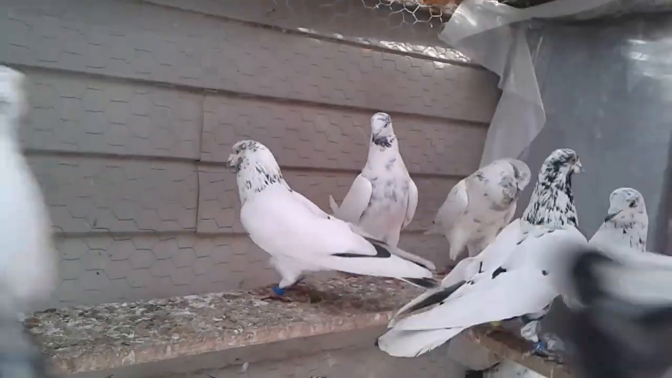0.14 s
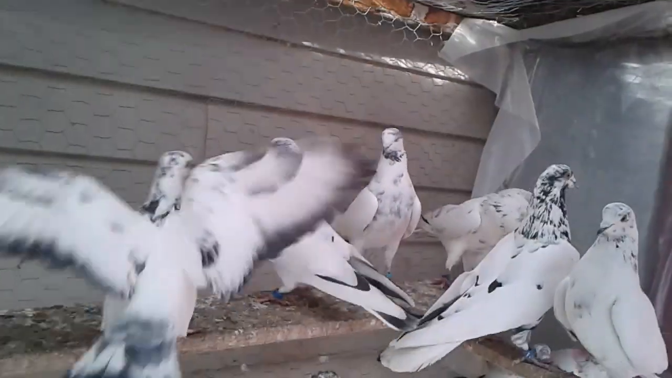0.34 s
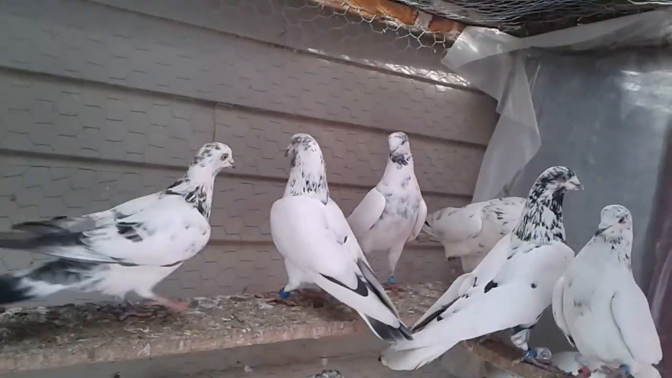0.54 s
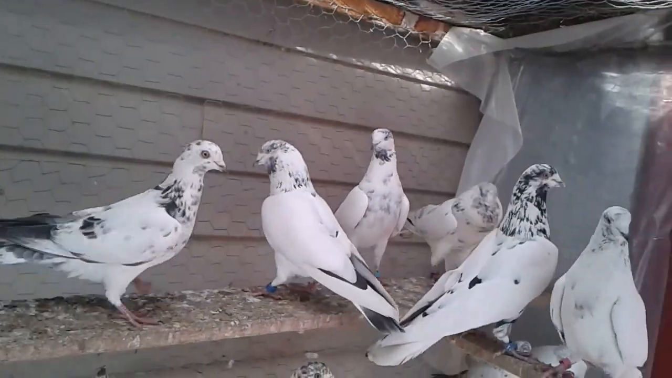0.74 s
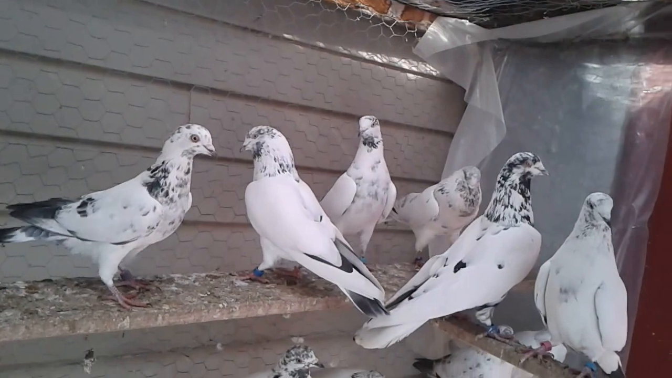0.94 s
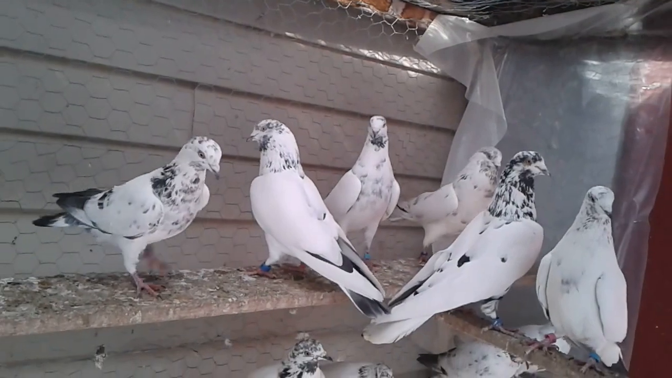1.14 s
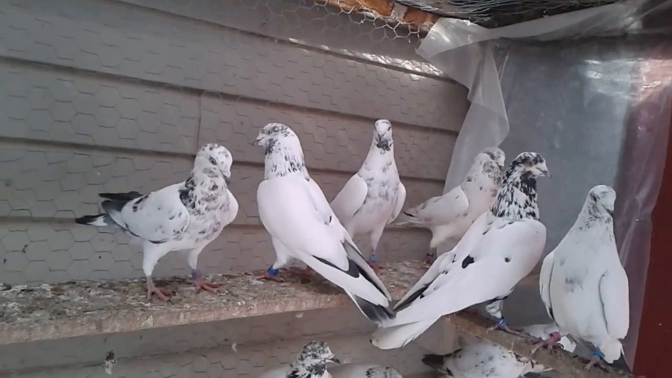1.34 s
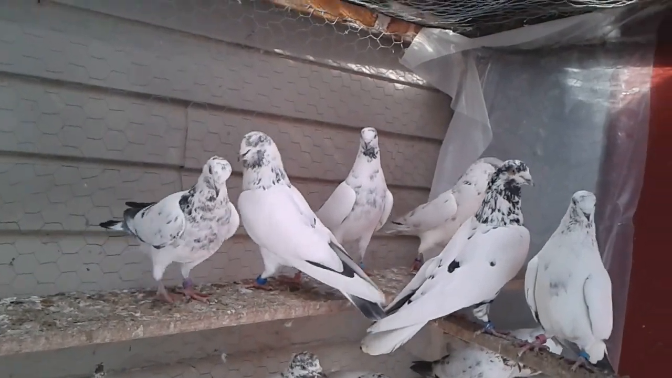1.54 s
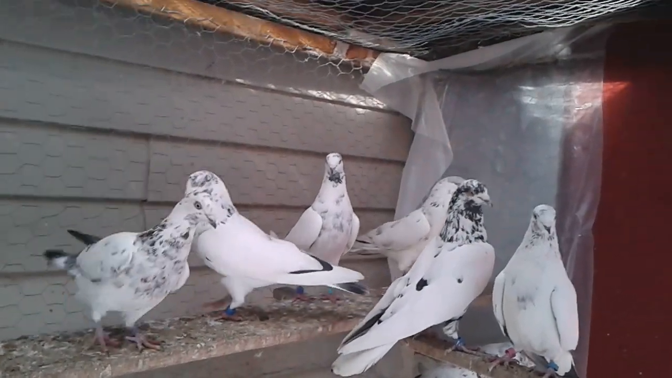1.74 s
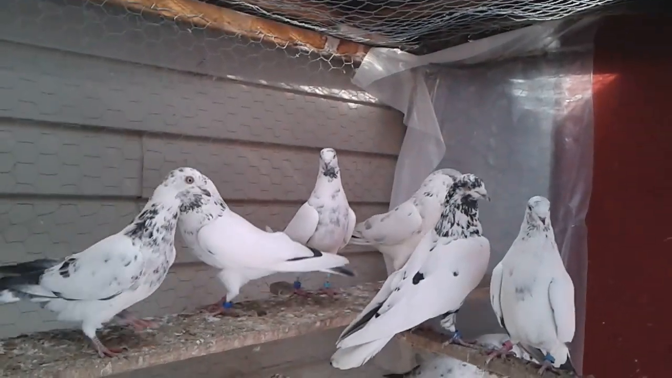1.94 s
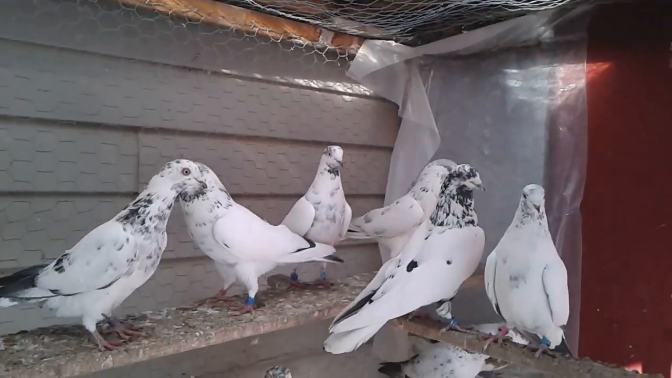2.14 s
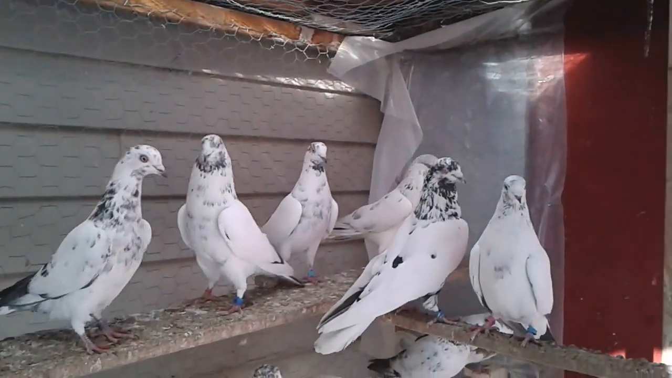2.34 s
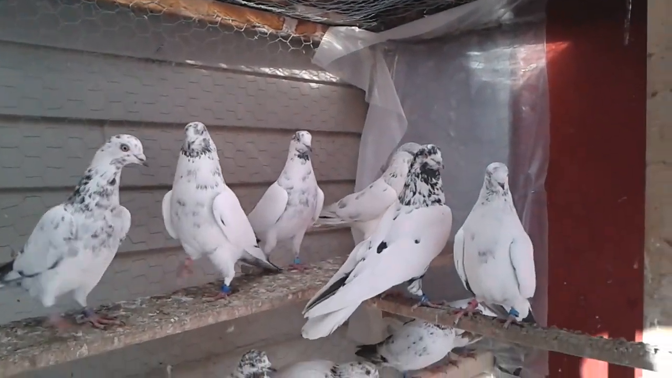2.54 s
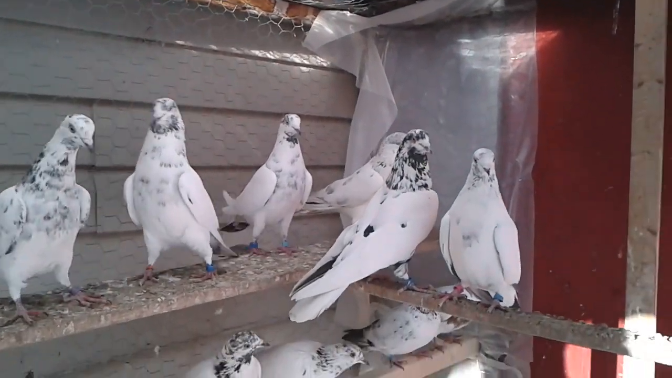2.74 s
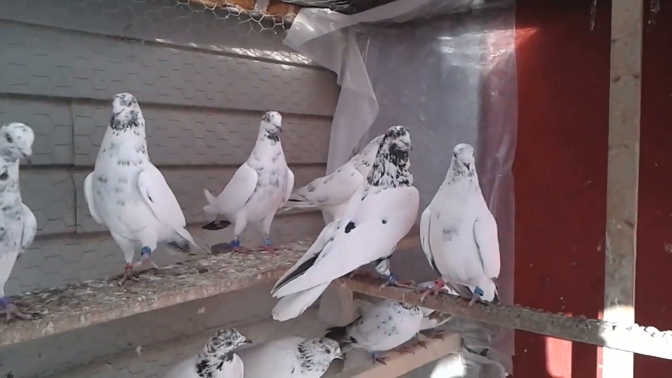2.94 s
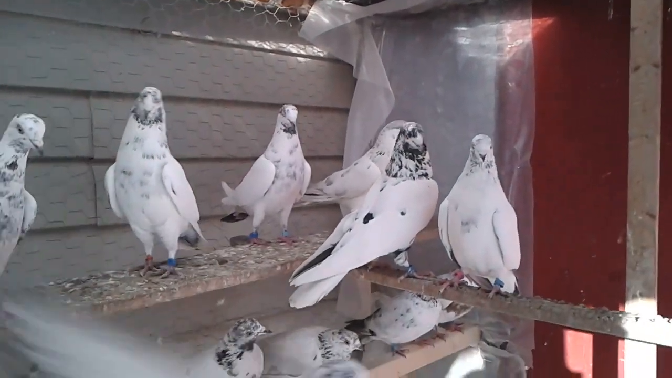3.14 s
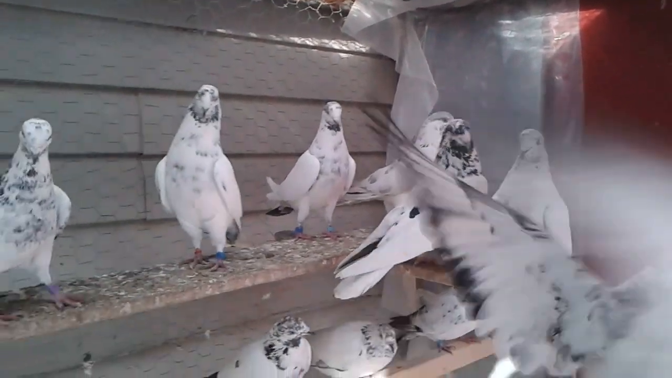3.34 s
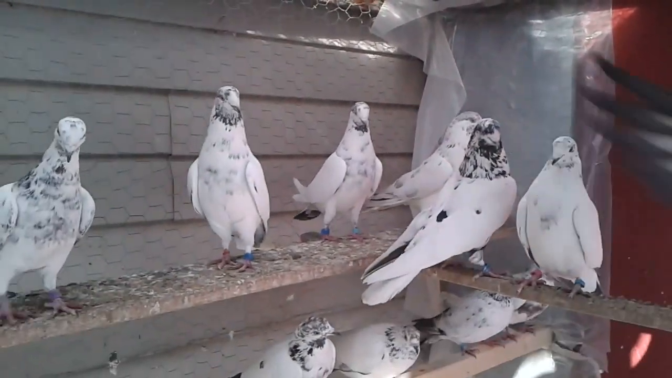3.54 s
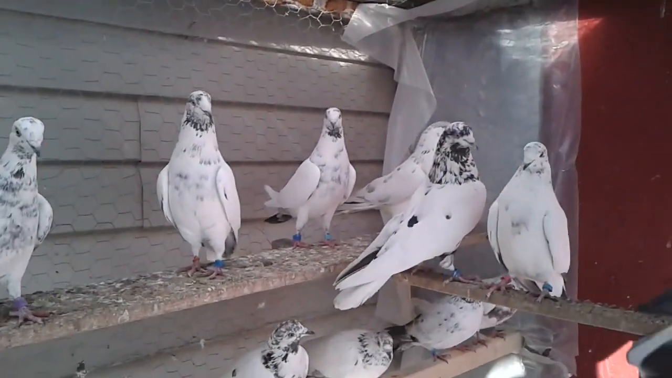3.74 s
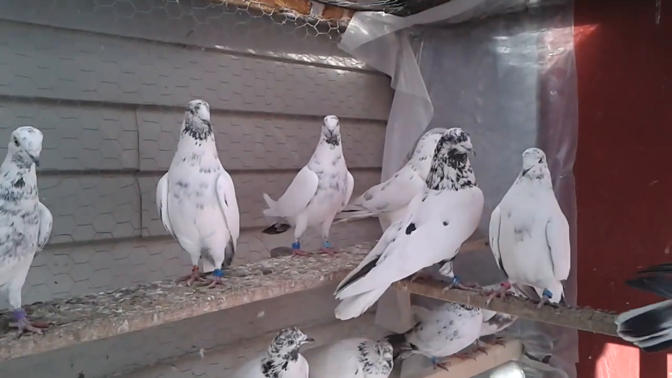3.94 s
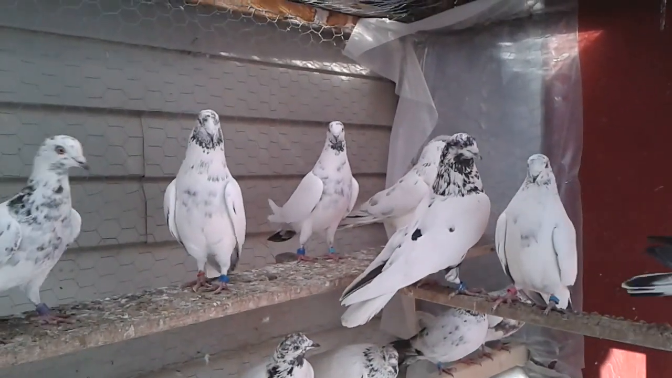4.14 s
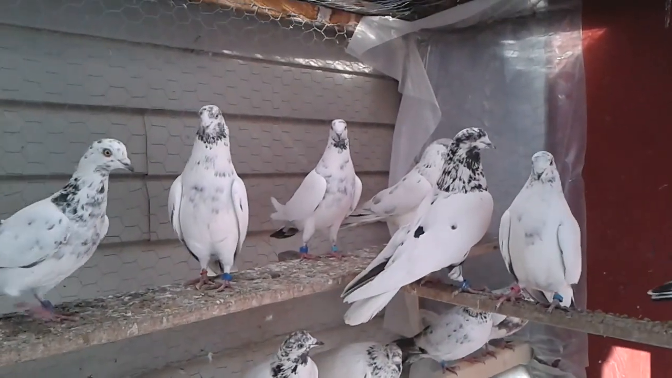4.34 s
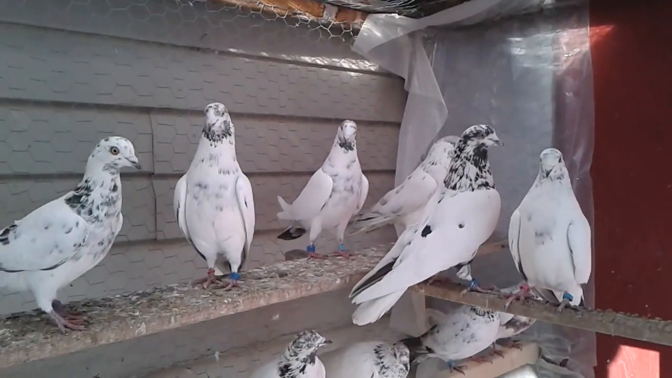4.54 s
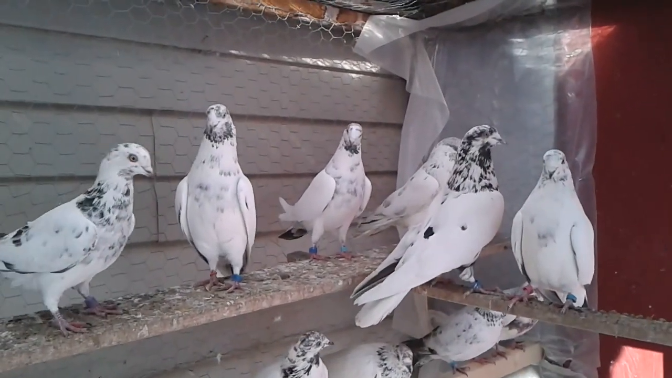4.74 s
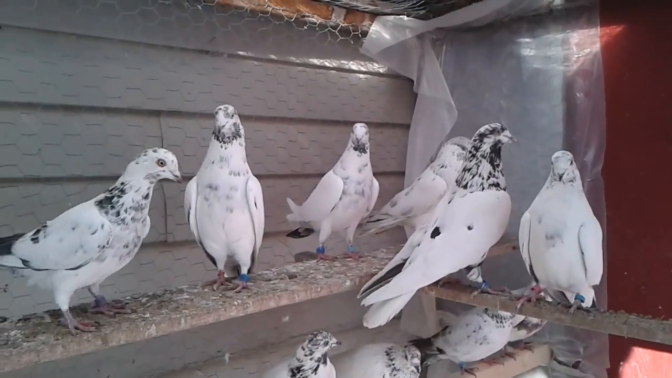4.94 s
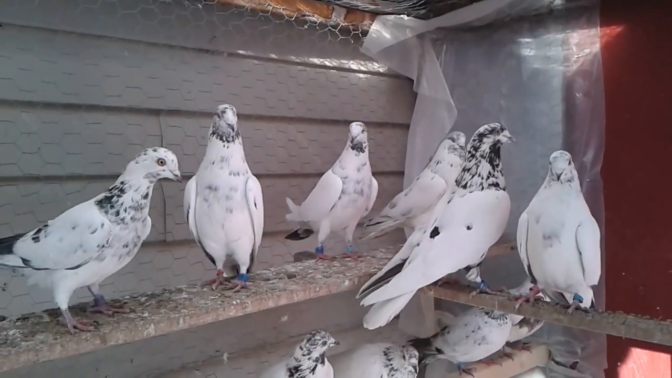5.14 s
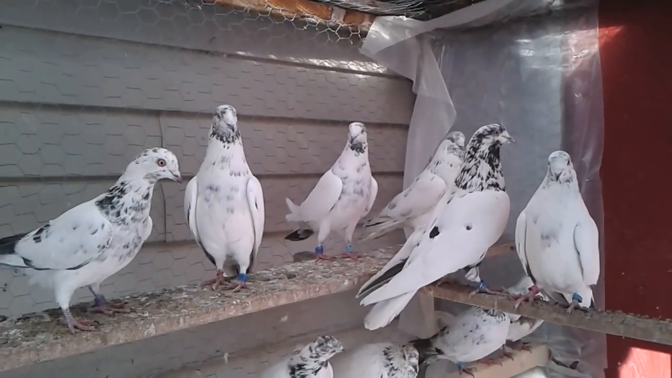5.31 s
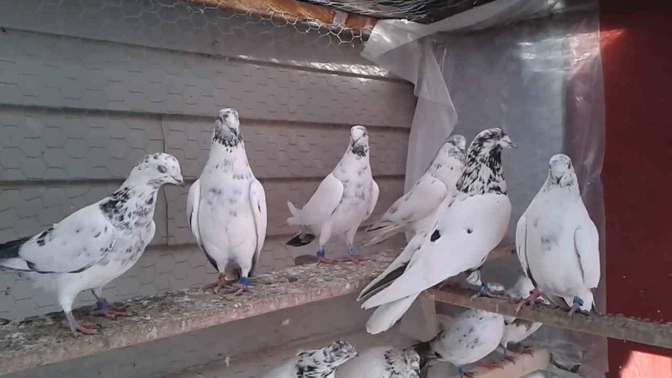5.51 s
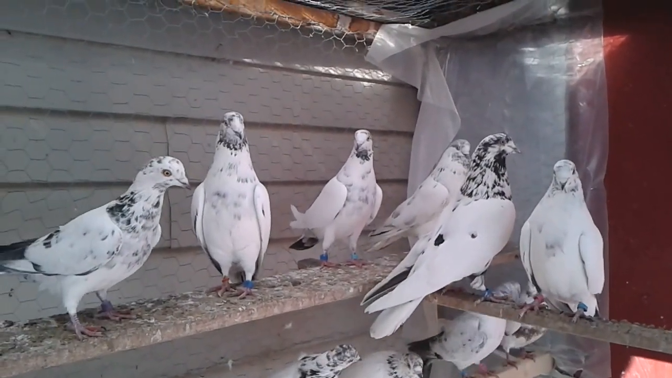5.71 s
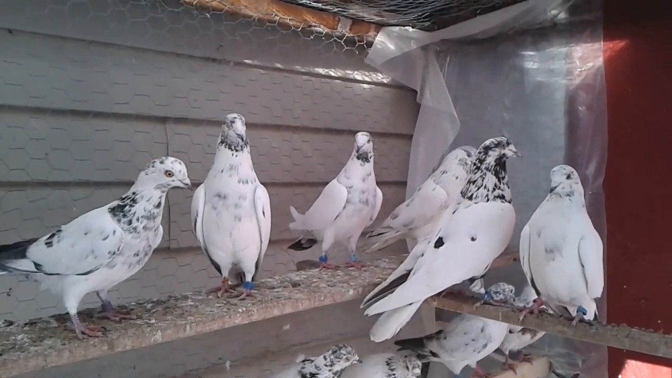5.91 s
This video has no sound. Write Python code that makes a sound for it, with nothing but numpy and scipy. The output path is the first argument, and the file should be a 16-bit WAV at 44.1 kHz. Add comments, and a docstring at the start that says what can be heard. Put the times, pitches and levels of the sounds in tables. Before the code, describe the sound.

A close single microphone, the same in both channels, in a small wooden pigeon loft with short reflections and a faint dull outdoor wash. From 0 to 0.45 s a bird lands: hard, bright wing claps, the loudest near 0.24 s slightly overloaded, with airy swishes, low gusts and brief feather buzzes. A dull board thump follows at 0.48 s. A cock coos three phrases, high arching notes falling into low moans with throaty rolling pulses, about 0.4-0.85, 0.93-1.45 and 1.85-2.55 s, the last strongest. Feathers shuffle between; a dull knock comes at 1.6 s alongside a faint distant coo. At 3.1-3.45 s another bird flaps past, softer and more muffled. Scratchy claw ticks stand out at 3.5-3.7 s, then sparse light steps until about 5.2 s, with a soft thud at 4.6 s. Rustling fades almost away, a gentle feather brush comes near 5.6 s, and a tiny bright ping sounds at 5.95 s.

```python
"""Pigeons in a wooden loft

One bird lands with loud wing claps, a cock coos three rolling phrases, and a second bird flies past.
Between the flights feathers rustle, claws tick on the perches, and a dull knock and a faint distant
coo are heard over an outdoor wash. Wings, feet and air are noise shaped by envelopes and spectra;
coos are gliding partials and ringing throat pulses; feather flutter is a wavering tone.
Wooden walls add a short reverberation."""
import sys
import numpy as np
from scipy import signal
from scipy.fft import rfft, irfft
from scipy.io import wavfile
from scipy.ndimage import uniform_filter1d

SR = 44100
rng = np.random.default_rng(int(sys.argv[2]) if len(sys.argv) > 2 else 0)


def to_wav(sig):
    """Store sig (one row per channel, or 1-D mono) as 16-bit WAV at the path in sys.argv[1].

    Samples outside -1..1 are clipped; the rate is SR.
    """
    pcm = np.clip(np.atleast_2d(sig), -1, 1) * 32767
    pcm = np.round(pcm).astype(np.int16)
    wavfile.write(sys.argv[1], SR, pcm.T)  # frames by channels


N = 263277
TIME = np.arange(N) / SR  # s

# Stirring of the perched flock, as a curve: time_s, rustle_db (before the offset of each sound)
STIR = [(.75, -51.5), (1.06, -46.5), (1.25, -55), (1.55, -59.5), (1.73, -50), (1.92, -53), (2.15, -51.5),
        (2.42, -53.5), (2.9, -53.5), (3.73, -49.5), (3.82, -62.5), (4.7, -64), (5.1, -70.5), (5.55, -73),
        (5.8, -65)]
# Bright noise spectrum of sliding feathers and of the small tick: frequency_hz, relative_density_db
HISS = [(1500, -22), (3000, -6.5), (4300, -5), (5600, -6), (6800, -3), (8200, -1.5), (10000, -2),
        (12500, -2), (15000, -9.5)]
# The landing and the fly-past: full_effort_from_s, until_s, feather_hiss_db, air_swish_db, draught_db
FLIGHTS = [(0.025, 0.439, -29, -28, -40.5), (3.13, 3.415, -34, -30, -37.5)]
# Wingbeats in flight: start_s, clap_db, rise_s, decay_s, body_db (against the clap), following_sweep_db
WINGBEATS = [(0.0916, -7, 0.00054, 0.0057, -4.5, -21.5), (.118, -6.5, 0.00092, 0.0096, -9.5, -19.5),
             (0.2394, 0, 0.00094, 0.0039, -9.5, -14.5), (0.343, -4, 0.017, 0.0085, -8, -18),
             (3.124, -26, 0.0035, 0.012, -2, -39), (3.187, -14.5, 0.0055, 0.0095, -10.5, -42),
             (3.215, -23, 0.00075, 0.0065, 2, -31), (3.328, -12.5, 0.0019, 0.01, -3.5, -34),
             (3.426, -20, 0.0039, 0.0062, 1, -49)]
# Flicks and shuffles of perched birds, and one dull knock at 1.603 s:
# start_s, treble_db, rise_s, decay_s, body_db (against the treble)
SHUFFLES_AND_KNOCK = [(.612, -35.5, .022, 0.058, -8), (0.676, -30.5, .003, 0.0087, -7.5),
                      (0.772, -23, 0.025, 0.02, -11.5), (0.988, -27.5, .0029, 0.018, -5),
                      (1.603, -61, 0.0017, 0.014, 11.5), (1.791, -33.5, 0.003, 0.013, -0.5),
                      (1.85, -47, 0.018, 0.011, 4.5), (2.008, -37, 0.023, 0.1, -9),
                      (2.185, -41.5, 0.0087, 0.01, -29), (2.275, -40.5, 0.022, 0.02, -5),
                      (2.917, -41, 0.0049, 0.025, -1.5), (3.009, -39, .024, 0.02, 3.5),
                      (3.478, -32.5, 0.023, .013, -0.5), (3.614, -38.5, 0.0033, 0.016, -5),
                      (3.695, -39.5, 0.0078, 0.041, -5.5), (4.36, -54, 0.017, 0.014, -7),
                      (4.875, -57.5, 0.013, 0.023, -3), (5.58, -45.5, 0.065, 0.04, -9.5),
                      (5.725, -52.5, 0.012, 0.014, -4.5)]


def amp(db):
    """Logarithmic level: decibels become an amplitude ratio."""
    return 10 ** (np.asarray(db) / 20)


def unit(x):
    """Power normalisation: scales a signal to rms 1."""
    return x / np.sqrt(np.mean(x ** 2) + 1e-20)


def read(points, hz):
    """Interpolation of a spectrum along a logarithmic frequency axis."""
    point_hz, value = np.transpose(points)
    return np.interp(np.log(hz + 1), np.log(point_hz + 1), value)


def add(mix, s, sound):
    """Superposition: adds a sound to the mix in place, from time s."""
    part = mix[max(round(s * SR), 0):][:len(sound)]
    part += sound[:len(part)]


def colour(x, spectrum, size=4096):
    """Minimum-phase filtering: the log gain fixes the phase of a causal filter of unit energy."""
    hz = abs(np.fft.fftfreq(size, 1 / SR))
    log_gain = np.log(amp(read(spectrum, hz)))
    response = np.exp(np.conj(signal.hilbert(log_gain)))
    taps_in_time = np.fft.ifft(response).real[:size // 2]
    return signal.oaconvolve(x, taps_in_time / np.linalg.norm(taps_in_time))[:len(x)]


def wander(rate_hz):
    """Low-pass random process of rms 1: a Gaussian roll-off leaves little motion above the rate."""
    hz = np.fft.rfftfreq(N, 1 / SR)
    spectrum = rfft(rng.standard_normal(N)) * np.exp(-(hz / rate_hz) ** 2)
    return unit(irfft(spectrum, N))


def grainy(clump_db, clump_hz):
    """Random amplitude modulation: noise comes in clumps, as barbs slip over each other."""
    clumps = amp(clump_db * np.tanh(wander(clump_hz) / 2) * 2)
    return unit(rng.standard_normal(N) * clumps)


def shifting(x, depth_db, size=512):
    """Time-varying resonance: bands come and go as the gaps between feathers open and close."""
    z = signal.stft(x, SR, nperseg=size, noverlap=size - size // 4)[2]
    patches = rng.standard_normal(z.shape)
    for _ in range(2):  # smooth over frequency, then over time
        patches = uniform_filter1d(patches, size=3, axis=0)
        patches = uniform_filter1d(patches, size=7, axis=1)
    gain = unit(amp(depth_db * 2 * np.tanh(unit(patches) / 2)))
    return signal.istft(z * gain, SR, nperseg=size, noverlap=size - size // 4)[1][:N]


def burst(rise, decay):
    """Transient envelope: a quadratic swell to 1, then exponential decay (times in s)."""
    t = np.arange(SR // 4) / SR
    swell = np.minimum(t / max(rise, 1e-4), 1) ** 2
    return swell * np.exp(-np.maximum(t - rise, 0) / max(decay, 1e-4))


def ambient(level_db=-54):
    """Stationary coloured noise: a steady dull wash from outside."""
    # Outdoor wash: frequency_hz, relative_density_db
    wash_spectrum = [(12, -35.5), (20, -5), (43, -13.5), (172, 0.5), (246, -3), (315, 1.5), (426, -7),
                     (781, -7), (1470, -21), (2290, -22.5), (5840, -32.5), (7910, -31), (13300, -31.5),
                     (14500, -21)]
    return amp(level_db) * colour(rng.standard_normal(N), wash_spectrum)


def flight(start, end, approach_db_per_s=122.5, settle_db_per_s=84):
    """Exponential growth and decay: the effort of a flight swells, holds and settles."""
    before_s, after_s = np.maximum(start - TIME, 0), np.maximum(TIME - end, 0)
    return amp(-approach_db_per_s * before_s - settle_db_per_s * after_s)


def airflow(start, end, surge_db=4.0, lag_s=0.022, width_s=0.035):
    """Power law of moving air: it grows faster with effort than feather hiss and surges after each beat."""
    power = 1.15
    surge = np.max([np.exp(-((TIME - s - lag_s) / width_s) ** 2) for s, *_ in WINGBEATS], axis=0)
    return flight(start, end) ** power * amp(surge_db * (surge - 1))


def rustle(stir_hiss_db=0.5, stir_swish_db=0.0):
    """Friction and flow noise: feathers slide and comb the air, softly perched and loudly in flight."""
    # Air combed by feathers: frequency_hz, relative_density_db
    swish_spectrum = [(150, -16), (350, 3), (800, 2), (1300, -3.5), (2200, -4.5), (3300, -13),
                      (6000, -24.5)]
    stir_db = np.interp(TIME, *np.transpose(STIR))
    hiss, swish = amp(stir_db + stir_hiss_db), amp(stir_db + stir_swish_db)
    for start, end, hiss_db, swish_db, _ in FLIGHTS:  # levels add in power
        hiss = np.hypot(hiss, amp(hiss_db) * flight(start, end))
        swish = np.hypot(swish, amp(swish_db) * airflow(start, end))
    fidget = amp(1.7 * wander(45))
    barbs = colour(grainy(clump_db=1.5, clump_hz=400) * fidget * hiss, HISS)
    air = shifting(grainy(clump_db=2, clump_hz=120), depth_db=4.5)
    return barbs + colour(air * swish, swish_spectrum)


def draught(lumpy_db=6.0):
    """Low-frequency turbulence: lumpy air under a flying bird; claps, shuffles and the knock add gusts."""
    # Pushed air: frequency_hz, relative_density_db
    push_spectrum = [(15, -4.5), (30, -14.5), (70, -2), (130, -2), (260, 3.5), (450, -5.5), (900, -27),
                     (2000, -45)]
    gust_db = -28  # against the treble of its event
    gust_rise_s, gust_decay_s = 0.02, 0.026
    level = sum(amp(db) * airflow(start, end) for start, end, _, _, db in FLIGHTS)
    for s, db, rise, *_ in WINGBEATS + SHUFFLES_AND_KNOCK:
        add(level, s + rise, amp(db + gust_db) * burst(gust_rise_s, gust_decay_s))
    return colour(level * grainy(lumpy_db, clump_hz=25), push_spectrum)


def flutters(jitter=0.04):
    """Aeroelastic flutter: a feather vane buzzes at an unsteady pitch at the fastest part of a stroke."""
    # Buzzes: start_s, length_s, start_pitch_hz, end_pitch_hz, level_db, octave_db (against the level)
    buzzes = [(0.028, 0.043, 807, 740, -25, 4), (.045, 0.044, 805, 724, -20.5, -18),
              (0.165, 0.03, 787, 657, -24, -5.5), (0.357, .02, 1273, 1310, -18, -27),
              (3.131, 0.028, 890, 754, -29, -7.5), (3.208, 0.0336, 820, 947, -24, 2.5),
              (3.31, 0.028, 783, 855, -26.5, -5), (3.424, 0.01, 1070, 1010, -20, -13)]
    out, waver = np.zeros(N), 1 + jitter * wander(330)
    for s, length, start_hz, end_hz, db, octave_db in buzzes:
        n = round(length * SR)
        hz = np.linspace(start_hz, end_hz, n) * waver[round(s * SR):][:n]
        phase = 2 * np.pi * np.cumsum(hz) / SR
        tone = np.sin(phase) + amp(octave_db) * np.sin(2 * phase)
        add(out, s, np.sqrt(2) * amp(db) * np.hanning(n) * tone)
    return out


def strokes_and_knock():
    """Impulsive radiation: wings clap or brush, a bright crack on a body of air; one knock is mostly body."""
    # Crack of feathers: frequency_hz, relative_density_db
    crack_spectrum = [(1500, -20.5), (3000, -8.5), (4200, -7), (5600, -7.5), (7500, -3), (10500, -2),
                      (13000, -3.5), (15000, -14)]
    # Displaced air: frequency_hz, relative_density_db
    body_spectrum = [(60, -8.5), (200, -6), (550, -2), (1000, -3), (1600, -0.5), (2400, -2.5), (4000, -21),
                     (8000, -45)]
    sweep_rise_s, sweep_decay_s = 0.026, 0.018
    sweep_body_db = 1.5  # a sweep has this much more body than its clap
    claps = [beat[:-1] for beat in WINGBEATS]
    # after the clap the wings peel apart
    sweeps = [(s + rise, sweep_db, sweep_rise_s, sweep_decay_s, body_db + sweep_body_db)
              for s, _, rise, _, body_db, sweep_db in WINGBEATS]
    crack, body = np.zeros(N), np.zeros(N)
    for s, db, rise, decay, body_db in claps + sweeps + SHUFFLES_AND_KNOCK:
        add(crack, s, amp(db) * burst(rise, decay))
        add(body, s, amp(db + body_db) * burst(rise, decay))
    air = shifting(grainy(clump_db=2, clump_hz=500), depth_db=4)
    feathers = colour(crack * grainy(clump_db=2.0, clump_hz=918), crack_spectrum)
    return feathers + colour(body * air, body_spectrum)


def arch(start, length, turn, start_hz, turn_hz, end_hz, bend):
    """Power-law glide: sample numbers and pitch of a note that reaches a turning point and leaves it."""
    at = np.arange(round(start * SR), round((start + length) * SR))
    progress = np.linspace(0, 1, len(at))
    away = np.interp(progress, [0, np.clip(turn, .05, .95), 1], [-1, 0, 1])  # 0 at the turn
    outer_hz = np.where(away < 0, start_hz, end_hz)
    return at, turn_hz + (outer_hz - turn_hz) * abs(away) ** bend


def coos(third_db=-27, husk_db=-16, fade=0.16):
    """Resonant filtering of song: near-pure closed-beak notes; the crop favours the octave of low ones."""
    # High notes that open a phrase and arch:
    # start_s, length_s, turn_share_of_length, start_pitch_hz, turn_pitch_hz, end_pitch_hz, start_level_db
    hoots = [(.39, 0.2, 0.44, 419.8, 537, 428, -27), (0.953, .208, 0.437, 574, 622.6, 553, -45),
             (1.959, .265, .5, 489, 739, 546, -42)]
    # Low moans that sag: three close a phrase, the faint one at 1.498 s is a distant coo:
    # start_s, length_s, turn_share_of_length, start_pitch_hz, turn_pitch_hz, end_pitch_hz,
    # level_db (before the crop), octave_db (against the level)
    moans = [(0.654, 0.18, 0.38, 321.5, 302.2, 282, -37, -14),
             (1.157, 0.25, 0.33, 443, 273.7, 322.6, -37.5, 1),
             (1.498, 0.31, 0.59, 304.4, 284.6, 298, -53, -10.5), (2.237, .242, .56, 469, 281, 338, -32, -4)]
    # Swollen crop that shapes a moan: frequency_hz, gain_db
    crop = [(255, -28), (282, -4.5), (303, -2), (350, -0.5), (460, -6.5), (535, -13.5), (575, 4.5),
            (615, -4), (680, -19), (900, -27)]
    # Turbulence in the throat: frequency_hz, relative_density_db
    husk_spectrum = [(100, -25), (230, 5.5), (450, -4), (750, -9), (1100, -11.5), (2500, -47)]
    hoot_octave_db = -22  # against the fundamental
    hoot_db_per_octave = -9.5  # the note thins as it climbs
    moan_swell_db = 1.5  # growth from start to end
    bend = 1.9  # power of the arch and of the sag
    out = np.zeros(N)
    waver, tremble = 1 + 0.008 * wander(60), amp(1.1 * wander(70))  # of pitch, of level
    husk = amp(husk_db) * colour(rng.standard_normal(N), husk_spectrum)

    def sing(at, hz, first_db, octave_db):
        """Harmonic synthesis: three partials and a little husk, faded in and out."""
        phase = 2 * np.pi * np.cumsum(hz * waver[at]) / SR
        partials = enumerate([first_db, octave_db, octave_db + third_db], 1)
        tone = np.sqrt(2) * sum(amp(db) * np.sin(k * phase) for k, db in partials)
        effort = np.hypot(amp(first_db), amp(octave_db))
        return (tone * tremble[at] + effort * husk[at]) * signal.windows.tukey(len(at), fade)

    for *glide, db in hoots:
        at, hz = arch(*glide, bend)
        level = db + hoot_db_per_octave * np.log2(hz / hz[0])
        out[at] += sing(at, hz, level, level + hoot_octave_db)
    for *glide, db, octave_db in moans:
        at, hz = arch(*glide, bend)
        level = db + moan_swell_db * np.linspace(-.5, .5, len(at))
        out[at] += sing(at, hz, level + read(crop, hz), level + octave_db + read(crop, 2 * hz))
    return out


def thumps():
    """Impact excitation: the board under a landing bird gives a dull, low knock."""
    # Feet coming down: start_s, level_db, decay_s
    landings = [(.48, -27, 0.055), (0.675, -38, 0.031), (4.598, -46, 0.018)]
    # Struck board: frequency_hz, relative_density_db
    board_spectrum = [(30, -5), (70, -3.5), (105, 4), (140, -6.5), (200, 0), (300, -5), (450, -4),
                      (900, -14), (2000, -30), (5000, -76)]
    push = np.zeros(N)
    for s, db, decay in landings:
        add(push, s, amp(db) * burst(0.0068, decay))
    return colour(push * rng.standard_normal(N), board_spectrum)


def rolls():
    """Pulse excitation: slow pulses of the syrinx, each weaker, ring the two resonances of the crop."""
    # Short rolls that break into the coo and close it: start_s, peak_db (lower resonance, first pulse),
    # pulse_count, lower_resonance_hz, upper_resonance_hz, upper_db (against the lower)
    throat_rolls = [(0.606, -29, 1, 332, 430, -18), (.826, -41, 1, 288, 461, 6),
                    (.934, -31.5, 1, 292, 564, -0.5), (1.027, -31.5, 2, 331, 600, 1),
                    (1.392, -36, 1, 260, 500, -1), (1.858, -38.5, 1, 211, 573, -2),
                    (1.938, -38.5, 1, 298, 615, -8), (2.004, -28, 3, 335, 570, -6.5),
                    (2.111, -27, 3, 362, 530, -3), (2.216, -26.5, 2, 316, 572, -2),
                    (2.491, -32, 3, 278, 514, 6)]
    pulse_s, gap_s = 0.0056, 0.016  # swelling time, spacing of pulses
    fade_db = -4.5  # each pulse against the one before
    out, t = np.zeros(N), np.arange(SR // 12) / SR
    swell = (t / pulse_s * np.exp(1 - t / pulse_s)) ** 1.6
    for s, db, pulses, low_hz, high_hz, upper_db in throat_rolls:
        lower = np.sin(2 * np.pi * low_hz * t)
        upper = amp(upper_db) * np.sin(2 * np.pi * high_hz * t)
        for k in range(round(pulses)):
            add(out, s + k * gap_s, amp(db + k * fade_db) * swell * (lower + upper))
    return out


def taps(tick_db=-3, knock_db=-4, tick_decay=0.0069, knock_decay=0.014):
    """Friction and impact: a claw scratches a short tick out of the perch, and the wood answers dully."""
    # Clearest claw steps: start_s, level_db (before tick_db or knock_db), wood_db (against the level)
    steps = [(0.9032, -34.5, -24), (1.1463, -39.5, 0), (1.457, -50, 2), (2.0785, -34, -12),
             (2.6813, -36, -12), (2.805, -51.5, 6), (3.5309, -25, -16), (3.5653, -33.5, -19),
             (3.6652, -25.5, -21), (3.9666, -37.5, -9.5), (4.0964, -41, -7.5), (4.144, -37.5, -8),
             (4.1644, -42, -19), (4.446, -37.5, -8), (4.5988, -38, -8.5), (4.6864, -37.5, -8),
             (4.716, -40.5, -19), (4.7658, -37.5, -12), (4.9494, -47.5, -4), (5.1778, -50, -15.5)]
    # Scratching claw: frequency_hz, relative_density_db
    claw_spectrum = [(1500, -24), (4000, -13), (5700, -14), (7200, -1), (8300, 3), (10000, -5.5),
                     (14000, -13.5)]
    # Answering wood: frequency_hz, relative_density_db
    wood_spectrum = [(150, 1.5), (400, -3.5), (1200, -2.5), (2000, 4.5), (2900, 3.5), (4000, -3.5),
                     (6000, -42.5)]
    # further steps at random moments, their level set against the stirring of the flock
    faint_steps, faint_db, faint_spread_db, faint_wood_db = 22, 4, 3.5, -7
    chance = rng.uniform([0, -1], [N / SR, 1], (faint_steps, 2))
    faint = [(s, np.interp(s, *np.transpose(STIR)) + faint_db + faint_spread_db * size, faint_wood_db)
             for s, size in chance]
    tick, knock = np.zeros(N), np.zeros(N)
    for s, db, wood_db in steps + faint:
        add(tick, s, amp(db + tick_db) * burst(0.0017, tick_decay))
        add(knock, s, amp(db + wood_db + knock_db) * burst(0.00094, knock_decay))
    scratch = colour(tick * grainy(clump_db=5.5, clump_hz=1200), claw_spectrum)
    return scratch + colour(knock * rng.standard_normal(N), wood_spectrum)


def ping(start_s=5.949, tick_db=-43.0):
    """Modal ringing: something small and hard is touched, a tick and then a brief bright ring."""
    # Modes of the ring: frequency_hz, level_db, decay_s
    modes = [(1600, -49, 0.012), (1955, -42, 0.018), (2240, -38.5, 0.02)]
    out, t = np.zeros(N), np.arange(SR // 4) / SR
    add(out, start_s, amp(tick_db) * burst(0.002, 0.02))
    out = colour(out * rng.standard_normal(N), HISS)
    for hz, db, decay in modes:
        add(out, start_s, amp(db) * burst(0.0029, decay) * np.sin(2 * np.pi * hz * t))
    return out


def off_axis(x):
    """Directivity: the microphone's body notches and peaks the treble of birds low down and to the side."""
    # Response to the side: frequency_hz, relative_gain_db
    side_response = [(100, -1), (200, 0), (520, -4), (1000, 1), (2300, 2.5), (3600, 2.5), (4700, -1),
                     (5650, -1.5), (6500, -0.5), (8000, 5.5), (10000, -2), (15000, 0)]
    # Portion of the wing sound that arrives from there: time_s, share
    side_share = [(2.6, 0), (2.95, 1)]
    share = np.clip(np.interp(TIME, *np.transpose(side_share)), 0, 1)
    return x * (1 - share) + colour(x * share, side_response)


def loft(x):
    """Reverberation: close wooden walls return dense reflections, each band dying at its own speed."""
    # Reverberation time, the fall by 60 dB: frequency_hz, t60_s
    decay_times = [(100, 0.45), (400, 0.38), (1500, 0.19), (8000, 0.14), (15000, 0.041)]
    scatter = rng.standard_normal(SR // 2) * (rng.random(SR // 2) < 4000 / SR)  # 4000 echoes a second
    hz, t, z = signal.stft(scatter, SR, nperseg=256)
    decay = amp(-60 * t / read(decay_times, hz)[:, None])
    tail = signal.istft(z * decay, SR, nperseg=256)[1]
    tail = np.concatenate([np.zeros(round(0.003 * SR)), tail])  # path to the walls
    return signal.oaconvolve(x, tail / np.linalg.norm(tail))[:N]


def scene(wing_room_db=-11.5, voice_room_db=-12):
    """Superposition: birds and loft reach one microphone, alike in both channels."""
    wings = off_axis(strokes_and_knock() + rustle() + draught()) + flutters()
    feet = taps() + thumps() + ping()
    voice = coos() + rolls()
    room = loft(amp(wing_room_db) * (wings + feet) + amp(voice_room_db) * voice)
    return np.array([wings + feet + voice + room + ambient()] * 2)


def record(dry, edge_hz=14850):
    """Overload and band limiting: the loudest claps clip the input, then a low-pass cuts the top."""
    clipped = np.clip(dry, -1, 1)
    low_pass = signal.firwin(401, edge_hz, window=("kaiser", 8), fs=SR)
    return signal.oaconvolve(clipped, low_pass[None], "same")


dry = scene()
out = record(dry)
to_wav(out)
```